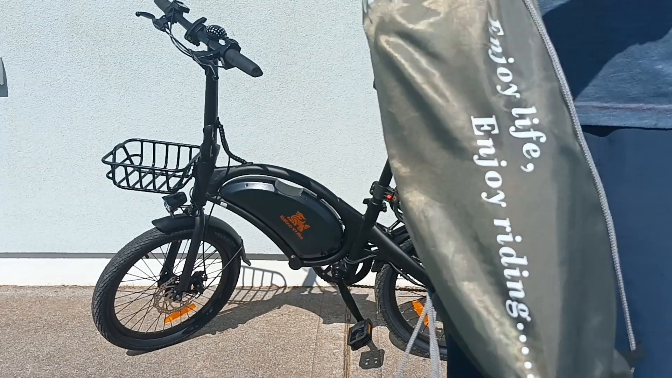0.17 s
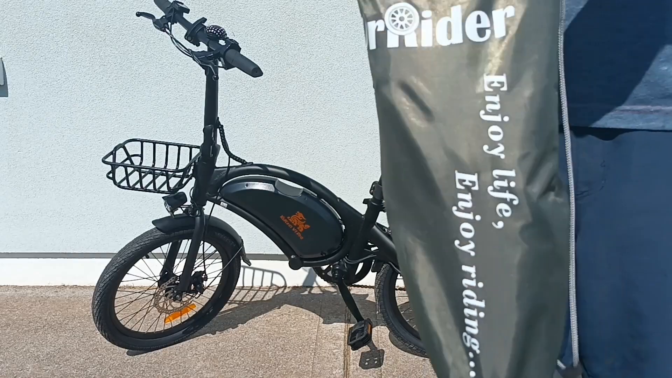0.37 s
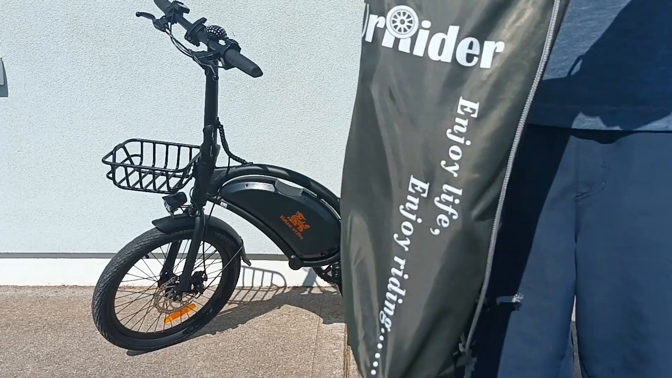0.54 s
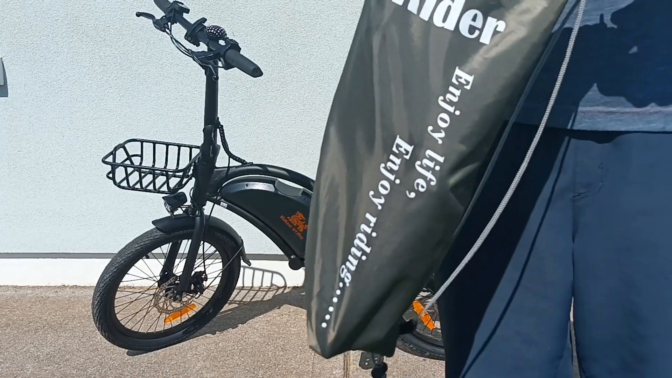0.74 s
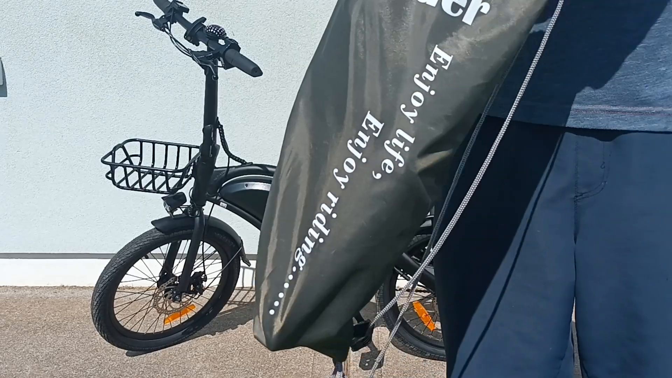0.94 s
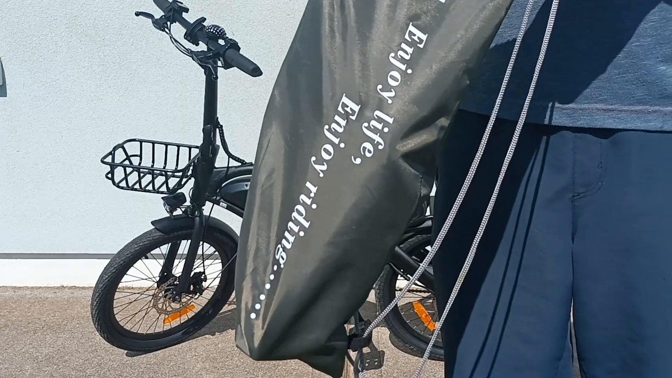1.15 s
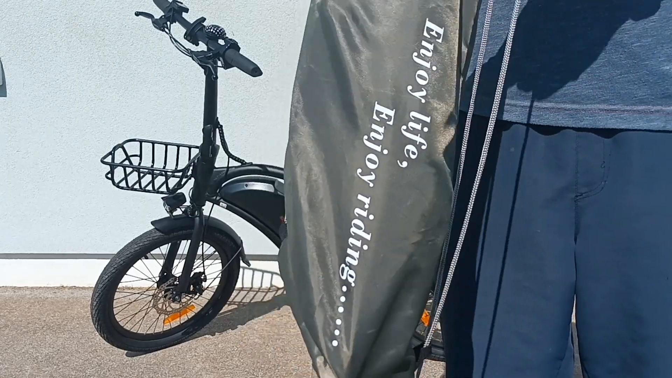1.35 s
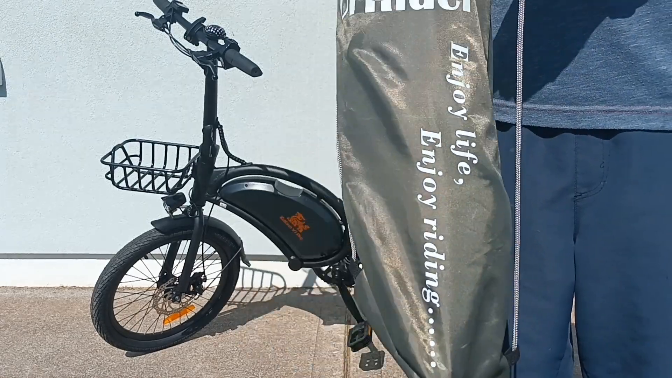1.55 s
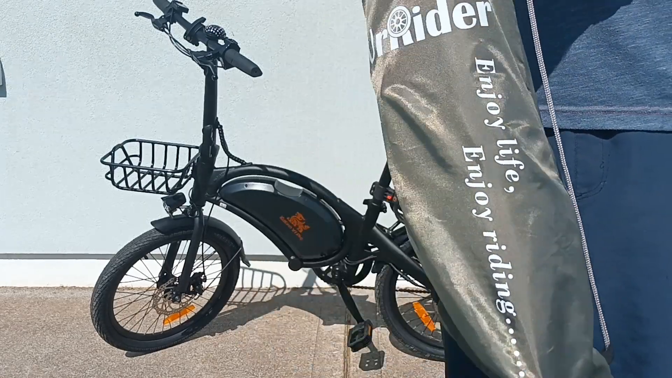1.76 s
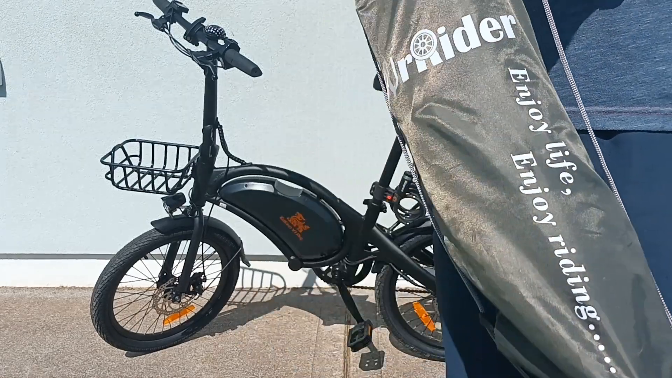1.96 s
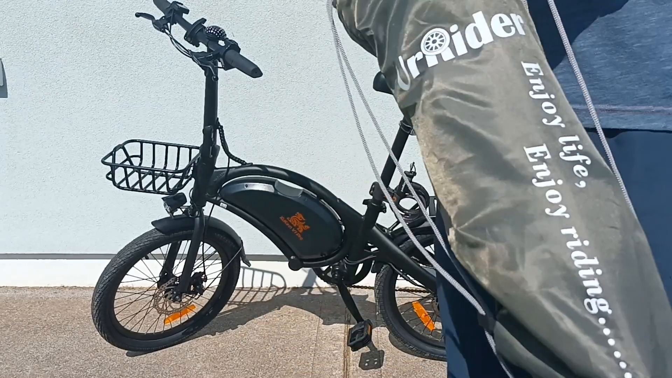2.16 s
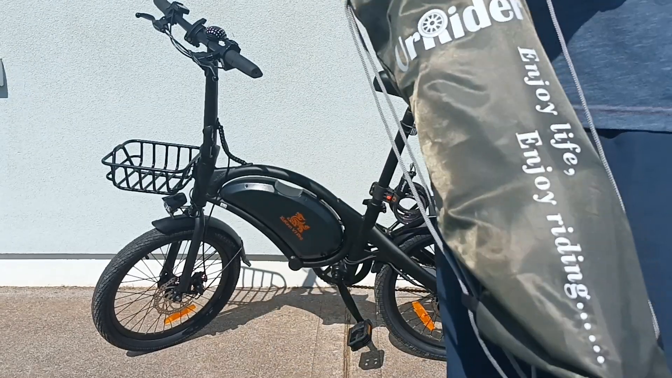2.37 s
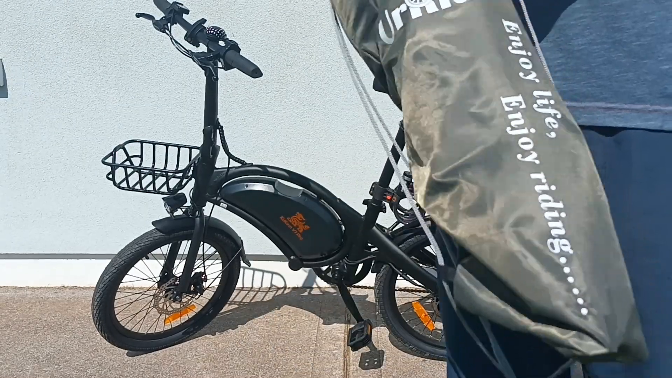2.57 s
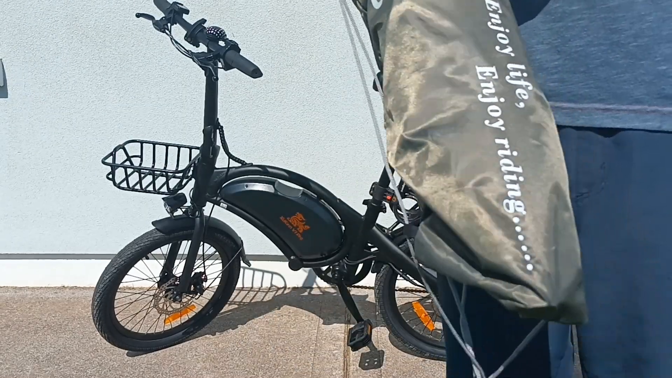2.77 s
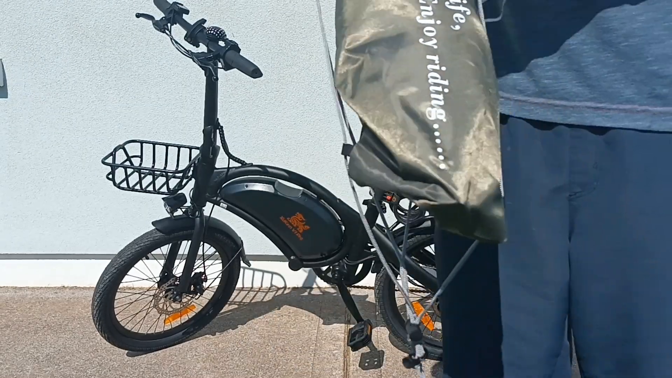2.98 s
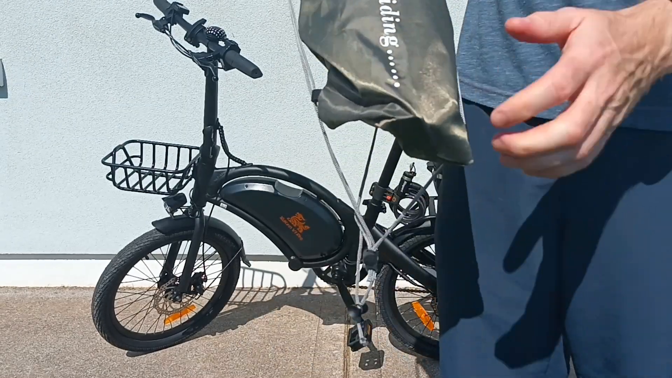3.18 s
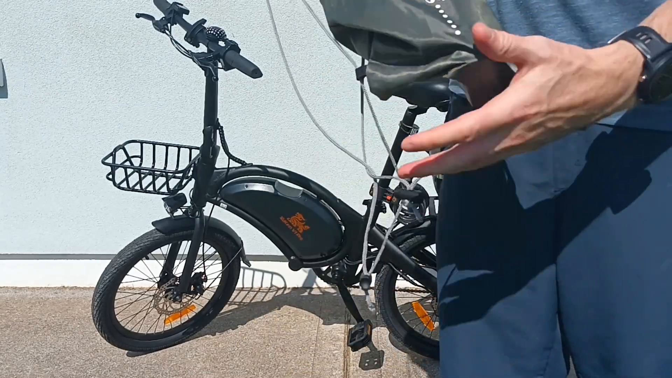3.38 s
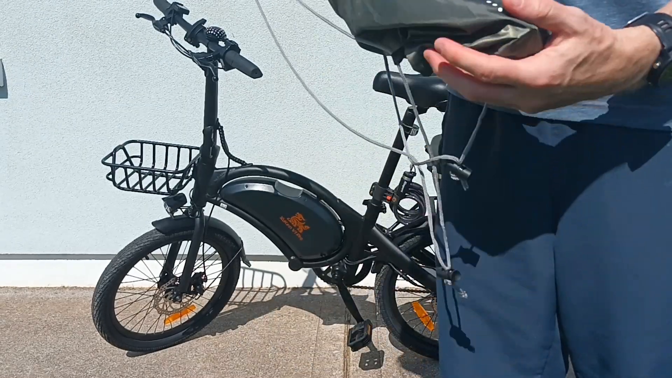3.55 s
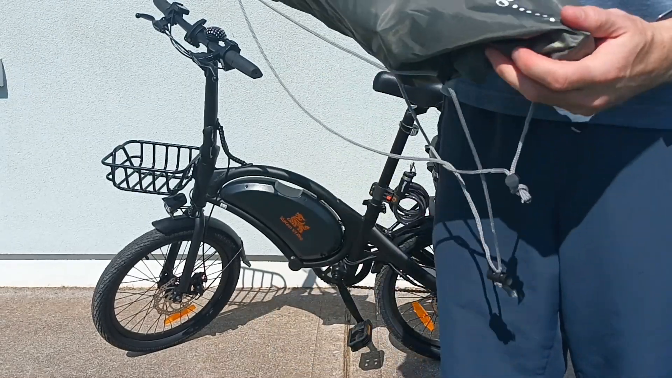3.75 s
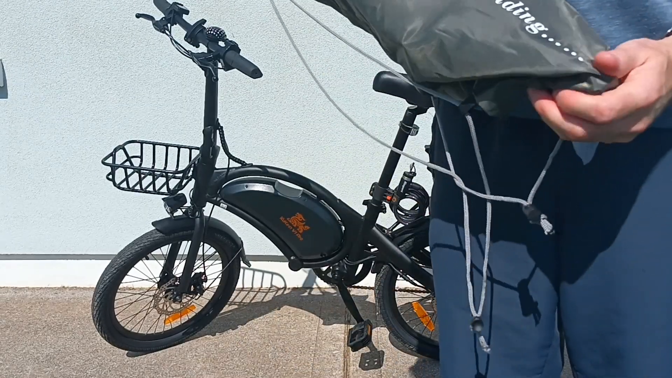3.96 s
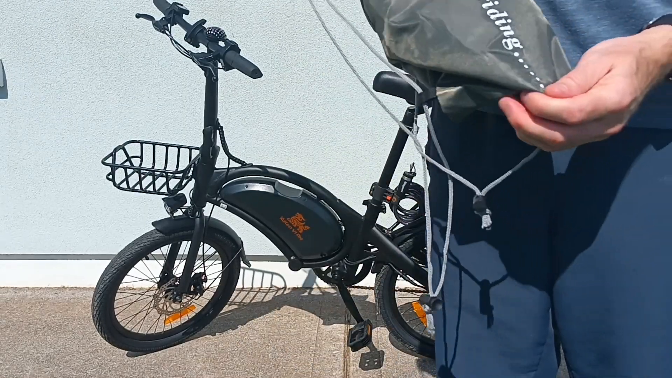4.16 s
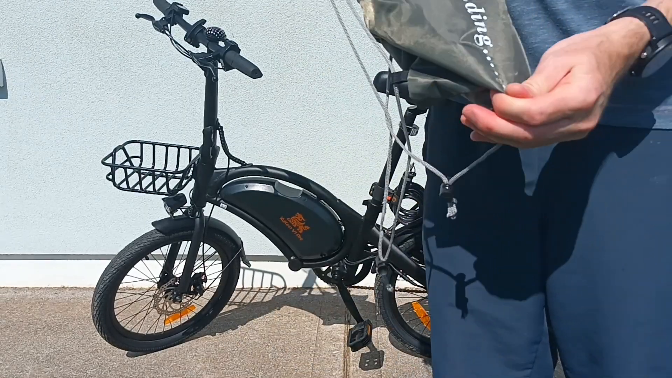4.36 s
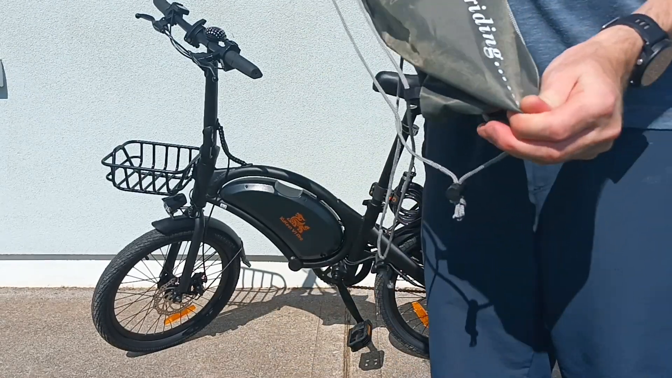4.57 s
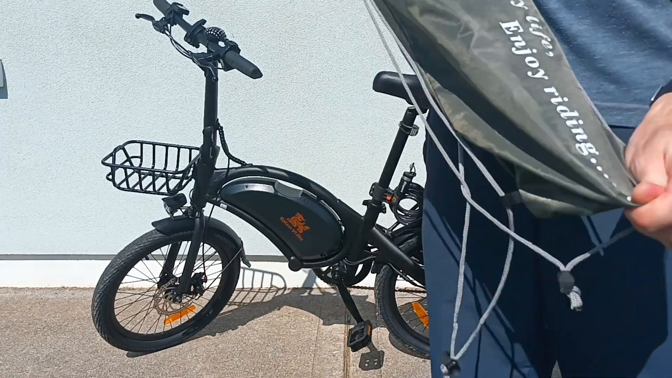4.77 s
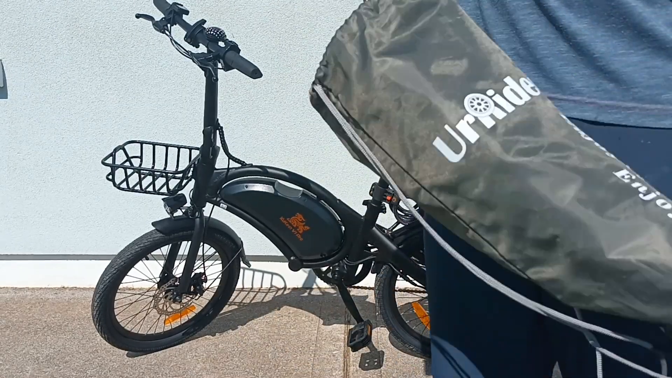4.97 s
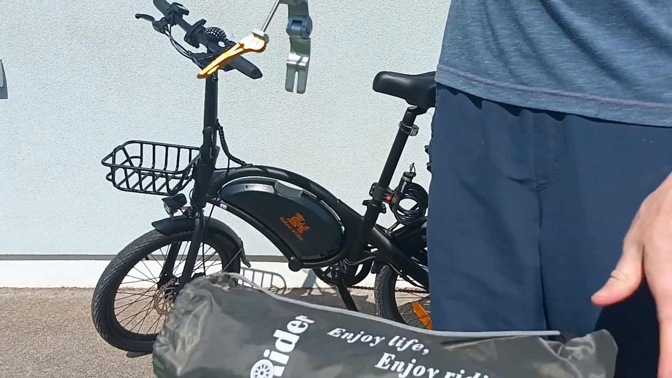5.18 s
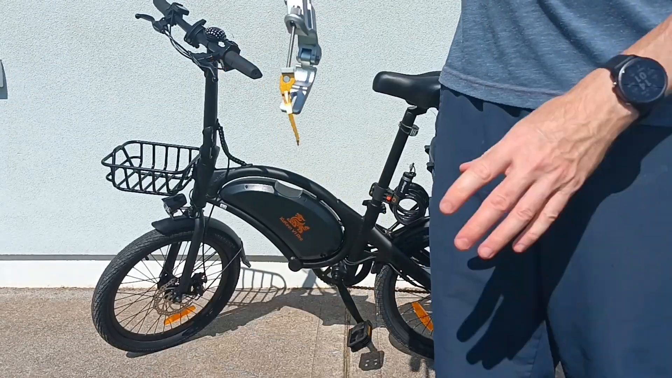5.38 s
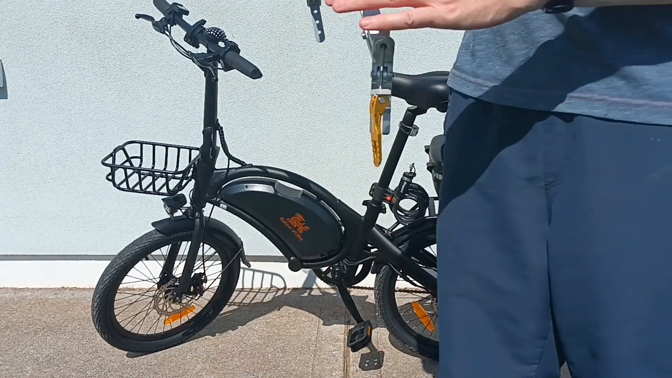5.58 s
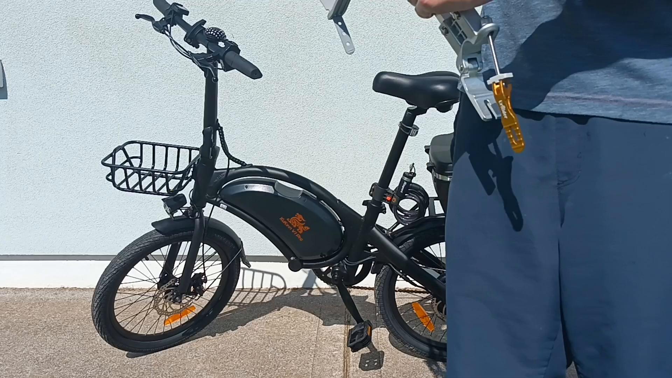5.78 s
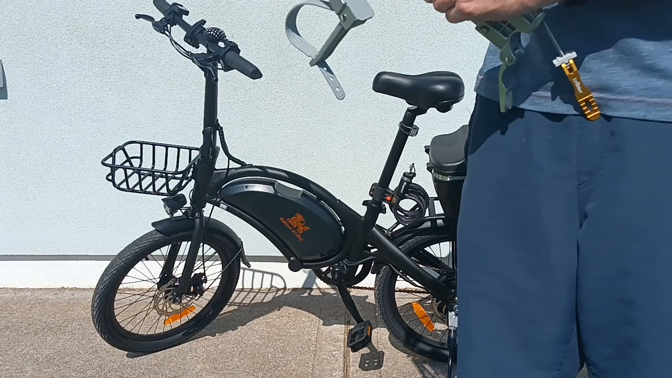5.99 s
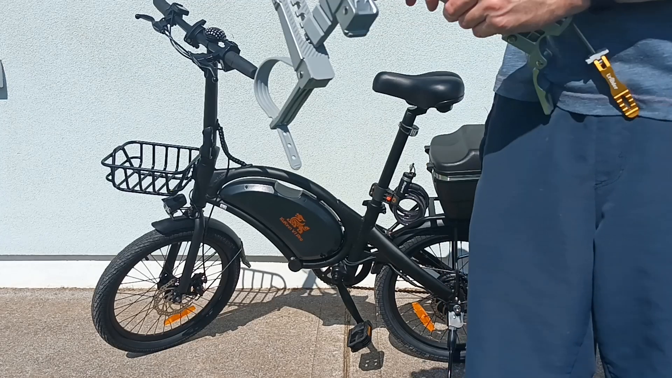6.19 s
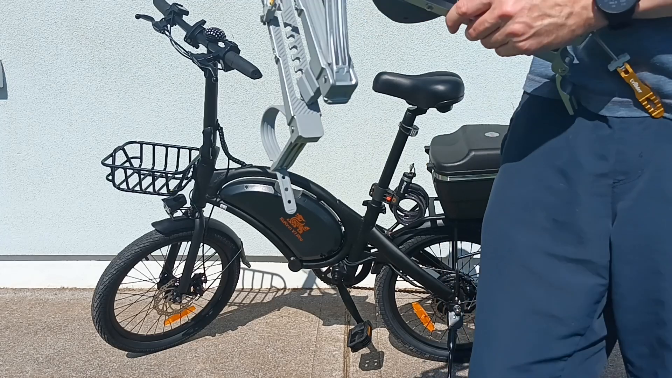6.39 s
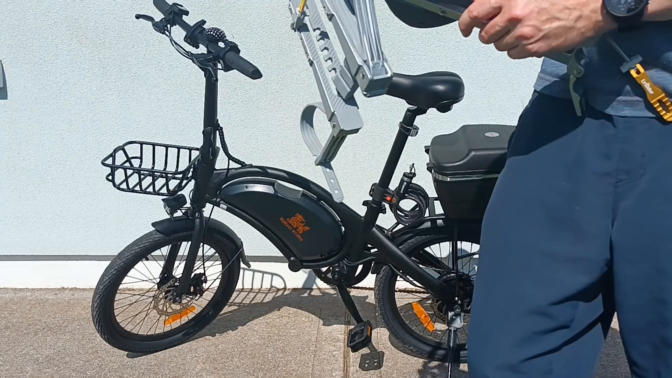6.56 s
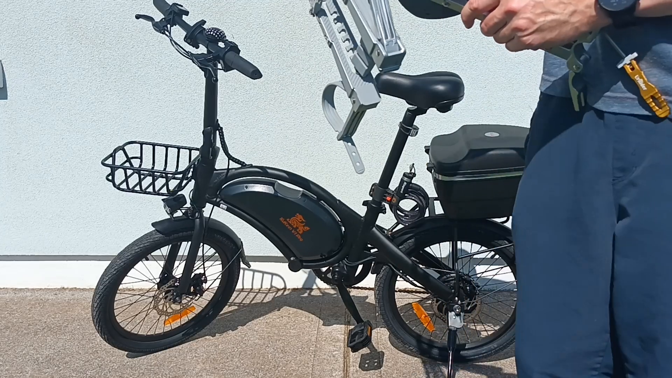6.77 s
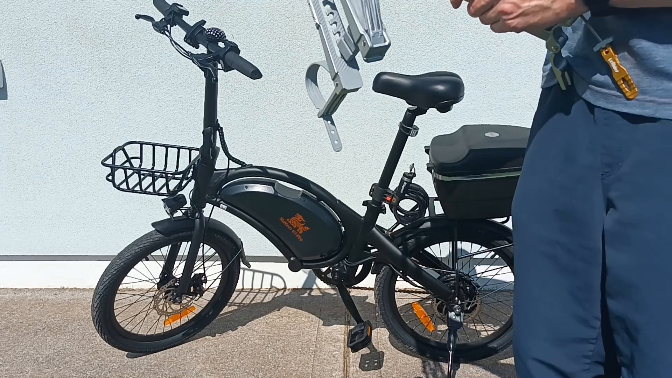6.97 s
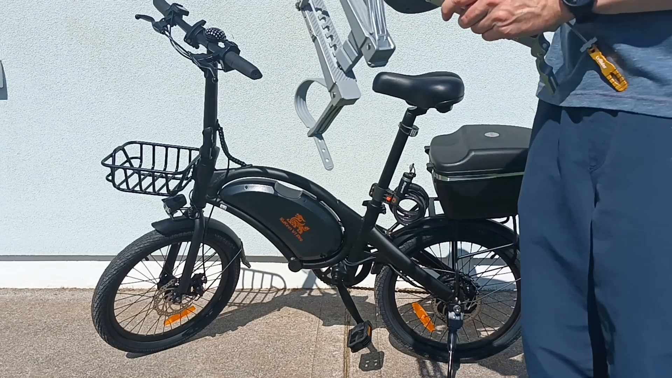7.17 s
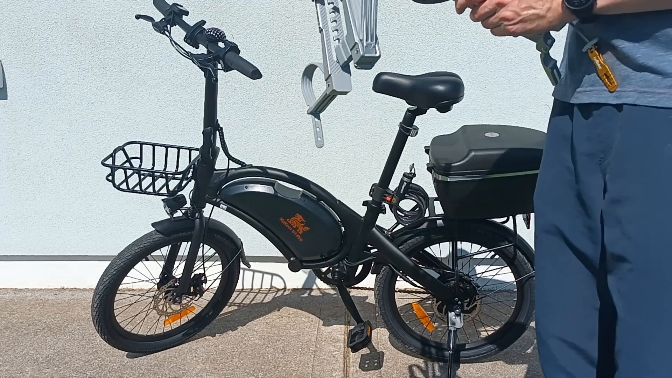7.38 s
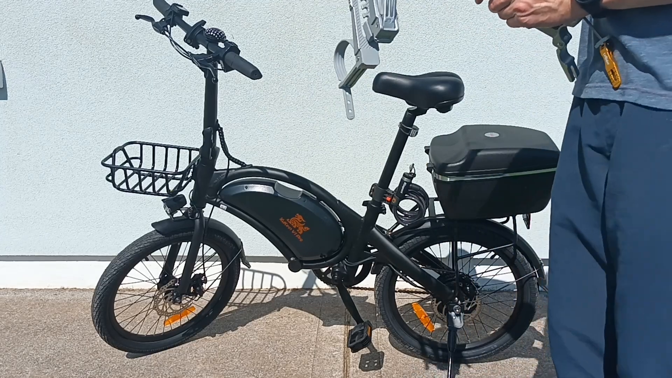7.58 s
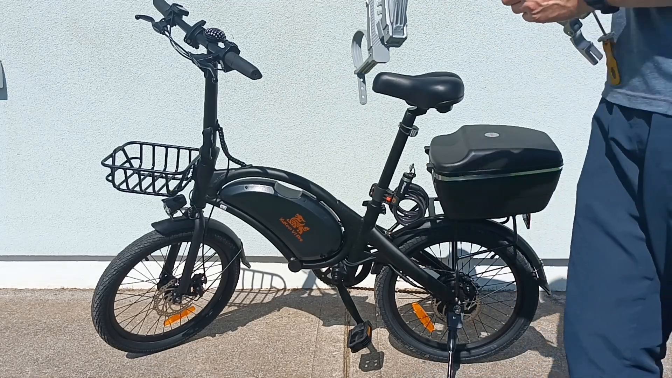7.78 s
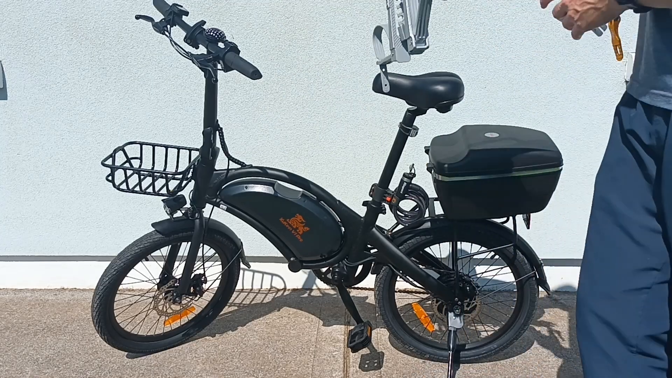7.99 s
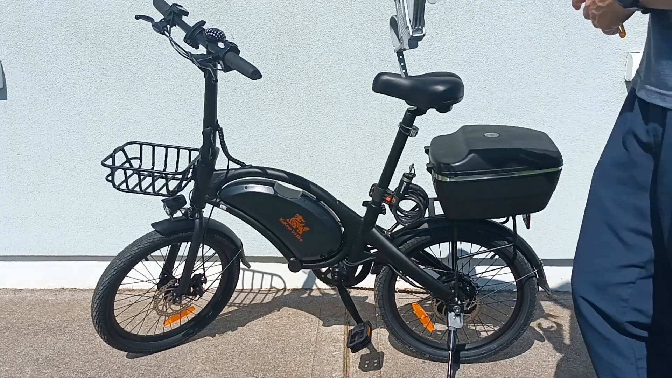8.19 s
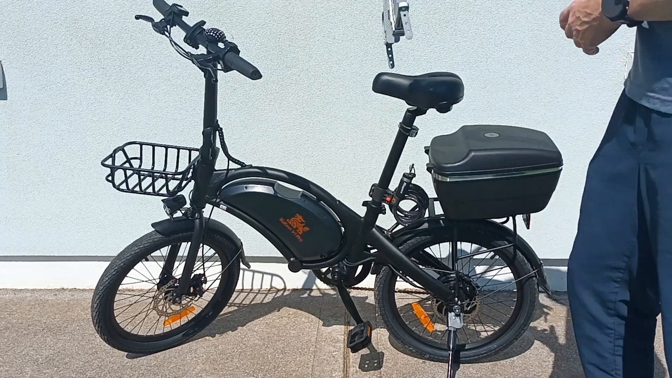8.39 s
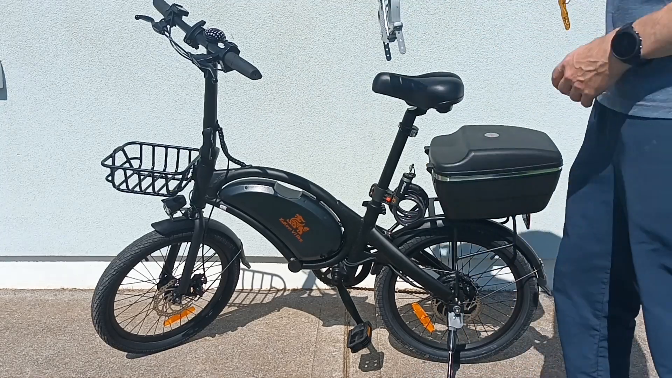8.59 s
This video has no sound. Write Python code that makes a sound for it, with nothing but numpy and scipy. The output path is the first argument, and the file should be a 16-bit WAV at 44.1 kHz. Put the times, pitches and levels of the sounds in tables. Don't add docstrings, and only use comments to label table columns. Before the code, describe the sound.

An outdoor stereo scene by a wall, with a faint, smooth hum of far traffic throughout. From 0 to 0.5 s a nylon bag hisses under rubbing hands, with a hard snap near 0.17 s and a wind thump. Light rustling and thin distant bird whistles follow until about 1.6 s, when stronger strokes and snaps resume until 2.7 s. After a lull, crinkling returns at 3.2 s and builds to the loudest rub and crack at 4.3-4.7 s as the bag is pulled off. Bare metal clinks at 4.8-5.2 s, brightest near 4.9; the bag slaps hollowly on paving at 5.3 s. Small metallic clicks and rings continue to 6.3 s. Then it is quiet, with soft handling rubs near 7.1-7.6 s. Bird whistles return from 6.6 s, livelier and echoing after 7.8 s. A sharp metallic knock at 8.2 s meets gusty low thumps until the end at about 8.6 s.

```python
import sys
import numpy as np
from scipy import signal
from scipy.fft import rfft, irfft, next_fast_len
from scipy.io import wavfile
from scipy.ndimage import map_coordinates

SR = 44100
rng = np.random.default_rng(int(sys.argv[2]) if len(sys.argv) > 2 else 0)


def pcm_store(signal):
    levels = np.round(np.clip(np.atleast_2d(signal), -1, 1) * 32767)
    wavfile.write(sys.argv[1], SR, levels.astype(np.int16).T)


def volts_from_db(level):
    exponent = np.asarray(level, float) / 20
    return 10 ** exponent


N = 380979


def unit_rms(x):
    return x / np.sqrt(np.mean(x ** 2) + 1e-20)


def seconds(length_s):
    return np.arange(round(length_s * SR)) / SR


def add_at(out, start_s, sound):
    start = round(start_s * SR)
    out[..., start:start + sound.shape[-1]] += sound


def in_time(rows):
    time_s, *columns = np.transpose(rows)
    return [np.interp(np.arange(N) / SR, time_s, column) for column in columns]


def at_hz(points, hz):
    point_hz, value = np.transpose(points)
    return np.interp(np.log(hz), np.log(point_hz), value)


def coloured(x, points):
    size = next_fast_len(N)
    hz = np.fft.rfftfreq(size, 1 / SR) + 1
    return irfft(rfft(x, size) * volts_from_db(at_hz(points, hz)), size)[..., :N]


def drift(rate_hz):
    r = np.exp(-40 * np.pi * rate_hz / SR)
    slow = signal.lfilter([1], [1, -2 * r, r * r], rng.standard_normal(N // 20 + 2002))[2000:]
    return np.interp(np.arange(N) / 20, np.arange(len(slow)), unit_rms(slow))


def band(x, low_hz, high_hz):
    return signal.sosfilt(signal.butter(2, [low_hz, high_hz], "band", fs=SR, output="sos"), x)


def ringing(modes, t):
    hz, level_db, t60_s = np.transpose(modes)[:, :, None]
    return volts_from_db(level_db - 60 * t / t60_s) * np.sin(2 * np.pi * hz * t)


# pitch_hz, likeness (0 to 1)
LIKENESS = [(60, 1), (300, 0.94), (1000, 0.85), (2500, 0.65), (5000, 0.55), (10000, 0.4)]


def pair(mid, side, hz):
    alike = np.clip(at_hz(LIKENESS, hz), 0, 1)
    opposite = side * np.array([[1], [-1]])
    return (np.sqrt(1 + alike) * mid + np.sqrt(1 - alike) * opposite) / np.sqrt(2)


# pitch_hz, level_db (per Hz)
HUM = [(30, -88), (120, -89), (300, -92), (600, -99), (1000, -100), (1600, -103), (2500, -105.5),
       (6000, -107), (8000, -109.5), (9600, -107.5), (11500, -114), (13000, -118), (16000, -116)]


def hum():
    mid, side = coloured(rng.standard_normal((2, N)), HUM) * np.sqrt(SR / 2)
    treble = side - signal.lfilter(*signal.butter(1, 900, fs=SR), side)
    apart = 1.16 * side + 0.039 * treble
    return np.array([mid + apart, mid - apart]) * 0.61


# start_s, hold_s, hiss_db, slackness_db
BAG = [(0, 0.19, -47, -7), (0.085, 0.1, -40.5, -5), (0.214, 0.1, -52, 0), (0.32, 0.065, -50, 1),
       (0.449, 0.034, -53, 5), (0.535, 0.18, -62.5, 4.5), (0.822, 0.042, -56.5, -4.5),
       (0.906, 0.14, -50, -11.5), (1.415, 0.025, -52.5, -1), (1.5, 0.07, -75.5, 5),
       (1.647, 0.028, -37, -16), (1.696, 0.16, -41.5, -14.5), (1.823, 0.17, -45, -7.5),
       (2.037, 0.087, -43.5, -6), (2.199, 0.15, -49.5, -1.5), (2.408, 0.014, -48, -2),
       (2.44, 0.032, -46.5, -5), (2.543, 0.11, -68.5, 6), (2.7, 0.013, -45, -14), (3.229, 0.0086, -50, -18),
       (3.305, 0.18, -51, -7.5), (3.426, 0.42, -56.5, -4), (3.861, 0.0063, -41.5, -8.5),
       (3.954, 0.096, -63, 2.5), (4.072, 0.18, -52.5, 4), (4.297, 0.074, -44, -2), (4.358, 0.14, -39.5, -3),
       (4.428, 0.16, -36, -3), (4.499, 0.032, -30.5, -9.5), (4.597, 0.058, -32.5, -11),
       (4.676, 0.045, -34, -15), (4.803, 0.13, -56, 2), (4.95, 0.085, -66, 3), (5.312, 0.038, -43, -9)]
# start_s, hold_s, hiss_db, slackness_db
HANDS = [(5.37, .06, -67, 5), (5.164, .012, -71, -2), (5.679, 0.015, -59, -4.5), (5.758, .012, -59.5, -2),
         (5.823, 0.1, -65, 6.5), (6.119, 0.0044, -77, 2), (6.293, .012, -61.5, 3), (7.13, 0.09, -54, -6.5),
         (7.267, 0.07, -61, -5), (7.35, .07, -56, -9), (7.6, 0.38, -67, -0.5), (8.237, 0.004, -52.5, -2),
         (8.284, 0.41, -65, -3.5)]


def strokes():
    attack_db_per_s, release_db_per_s = 485, 323
    rest_db, rest_slack_db = -79.5, 7.5
    t = np.arange(0, N + 64, 64) / SR
    start_s, hold_s, hiss_db, slack_db = np.transpose(BAG + HANDS)[:, :, None]
    before_s = np.maximum(start_s - t, 0)
    after_s = np.maximum(t - start_s - hold_s, 0)
    away_db = attack_db_per_s * before_s + release_db_per_s * after_s
    power, rest = volts_from_db(hiss_db - away_db) ** 2, volts_from_db(rest_db) ** 2
    total = power.sum(axis=0) + rest
    slack = ((power * slack_db).sum(axis=0) + rest * rest_slack_db) / total
    return in_time(np.transpose([t, 10 * np.log10(total), slack]))


# pitch_hz, level_db (per Hz)
CLOTH = [(200, -7), (380, 0), (600, -7), (800, -4), (1100, 0), (1600, -6), (2500, -5), (4000, -5),
         (6000, -6), (8000, -7), (10200, -6), (11400, -13), (13000, -19), (16000, -21)]


def cloth():
    creases_per_s, spread_db, crease_share = 900, 4.0, 0.1
    patchy_db, wander_samples = 2.6, 3.5
    hiss_db, slack_db = strokes()

    born = rng.random(N) < creases_per_s * volts_from_db(3.5 * drift(25)) / SR
    creases = unit_rms(born * volts_from_db(spread_db * np.minimum(rng.exponential(1, N), 4)))
    grain = 1 + crease_share * signal.lfilter([1], [1, -.93], creases)
    white = unit_rms(rng.standard_normal((2, 2, N)) * grain * volts_from_db(1.6 * drift(45)))

    panels_db, folds_db, weave_db = slack_db + 9.0, slack_db + 6.5, 0.8 * slack_db + 3.0
    parts_db = np.array([panels_db, folds_db, weave_db, np.zeros(N)])
    part_hz = [400, 1000, 2500, 8000]
    out = 0
    edges = np.geomspace(180, 17000, 21)
    for k, (low, high) in enumerate(zip(edges, edges[1:])):
        hz = np.sqrt(low * high)
        shares = [np.interp(np.log(hz), np.log(part_hz), row) for row in np.eye(4)]
        patches = patchy_db * (drift(7.5) + 0.57 * drift(24.3))
        gain = volts_from_db(hiss_db + shares @ parts_db + patches)
        out = out + gain * pair(*band(white[k % 2], low, high), hz)
    out[0] = map_coordinates(out[0], [np.arange(N) + wander_samples * drift(1.4)], order=3)
    return volts_from_db(6) * coloured(out, CLOTH)


# time_s, left_db, right_db
WIND = [(0, -61, -80), (.055, -32, -66), (.185, -44.5, -59), (1.1, -70, -69.5), (1.312, -55.5, -63),
        (2.1, -65, -62), (2.774, -43.5, -66), (2.963, -58.5, -69), (3.2, -45, -71), (3.55, -50.5, -68),
        (3.906, -59, -78), (4.53, -50.5, -52), (4.764, -62, -66), (5.4, -70, -69.5), (6.05, -68.5, -74),
        (7.483, -60, -67.5), (8.251, -41, -37.5), (8.635, -42.5, -47)]
# time_s, level_db, width_ms, port (0 left, 1 right)
THUMPS = [(0.076, -24.5, 3.5, 0), (2.691, -31, 2.3, 0), (2.772, -22.5, 3.4, 0), (3.457, -28.5, 2.7, 0),
          (3.569, -33, 4.5, 0), (4.541, -30, 1.2, 1), (4.542, -30, 1.2, 0), (4.6, -36, 1.5, 1),
          (2.47, -42, 1.0, 1), (2.489, -42, 1.0, 1), (8.287, -25, 2.5, 1), (8.493, -26, 3.5, 1),
          (8.252, -28, 4.0, 1), (7.73, -30.5, 3.7, 0), (8.009, -25.5, 1.95, 1), (8.236, -21.5, 1.6, 1),
          (8.331, -17, 1.9, 1), (8.36, -21, 2.06, 1)]


def wind():
    lumps_db = 3.8
    out = np.zeros((2, N))
    for port, level_db in enumerate(in_time(WIND)):
        white = rng.standard_normal(N)
        rumble = unit_rms(band(white, 26, 80)) + 0.02 * unit_rms(band(white, 80, 130))
        out[port] = volts_from_db(level_db + 2.5 + lumps_db * drift(13.2)) * rumble
    half = 600
    for time_s, level_db, width_ms, port in THUMPS:
        u = np.arange(-half, half) / SR / (width_ms / 1000)
        push = (1 - 0.68 * u ** 2) * np.exp(-u ** 2 / 2)
        middle = round(time_s * SR)
        out[round(port), middle - half:middle + half] += volts_from_db(level_db) * push
    return out


# start_s, pitch_hz, peak_db, t60_s
TICKS = [(.1635, 10100, -15, 0.012), (.171, 1140, -18, 0.02), (.106, 1080, -34, .03),
         (.324, 940, -33.5, 0.038), (.361, 870, -37, .04), (.445, 1090, -42, .03), (2.5665, 800, -34, .04),
         (1.65, 950, -35, .06), (2.566, 350, -40, 0.046), (3.483, 1000, -39, .03), (4.011, 2450, -46, .02),
         (4.053, 1150, -43, .03), (4.098, 940, -33.5, 0.043), (4.435, 11900, -36, .03),
         (4.452, 400, -27, 0.06), (4.8172, 1690, -37, .015), (4.8366, 9400, -37, .03),
         (4.838, 7300, -39, .03), (4.846, 1200, -49, 0.018), (4.8635, 1100, -38, 0.049),
         (4.895, 2940, -27, .04), (5.0, 1000, -47, 0.024), (5.112, 4150, -54, .02),
         (5.1325, 3900, -44.5, 0.032), (5.4927, 9700, -55, .03), (5.3543, 1650, -25, .007),
         (5.39, 1600, -48, .08), (5.5142, 8400, -51, .03), (5.5546, 3000, -55, .02),
         (5.6155, 2150, -45.5, 0.069), (5.6469, 4290, -44, 0.028), (5.660, 8500, -50, .03),
         (5.698, 6100, -48, .04), (5.70, 2200, -47, .03), (5.7402, 2000, -46, .04),
         (5.7536, 9900, -36.5, 0.045), (5.763, 2300, -47, .04), (5.805, 3870, -44, .04),
         (5.862, 4000, -54, .02), (5.871, 4300, -46, .02), (5.892, 4200, -51, .02),
         (5.9033, 4540, -34.5, 0.027), (5.909, 1900, -44, .04), (5.922, 1500, -45, .03),
         (6.1223, 9590, -42, 0.028), (6.1971, 3830, -50, .03), (8.238, 5300, -36, .04),
         (8.238, 4400, -35, .05), (8.226, 2800, -36, .07)]


def ticks():
    t, out = seconds(.08), np.zeros((2, N + SR))
    reach = 2 ** 0.25
    for start_s, hz, peak_db, t60_s in TICKS:
        dying = rng.standard_normal((2, len(t))) * volts_from_db(-60 * t / t60_s)
        burst = pair(*band(dying, hz / reach, hz * reach), hz)
        add_at(out, start_s, volts_from_db(peak_db - 3.5) * burst / np.abs(burst).max())
    return out[:, :N]


# start_s, length_s, pitch_hz (centre), width_octaves, level_db
SCUFFS = [(0.35, 0.05, 805, 0.69, -47.5), (0.54, 0.036, 700, 1.6, -57), (1.176, 0.09, 640, 2.4, -57),
          (4.95, 0.05, 8400, 0.22, -57.5), (4.884, 0.043, 3700, 2.5, -41.5), (5.29, 0.085, 2600, 1.4, -51),
          (.13, 0.035, 9900, 0.35, -43), (1.07, 0.07, 250, 3.84, -52.5), (.169, 0.012, 330, 1.3, -33),
          (6.287, 0.053, 3170, 0.92, -56.5), (6.496, 0.049, 8900, 4.5, -68),
          (7.72, 0.037, 1700, 3.3, -60.5)]


def scuffs():
    out = np.zeros((2, N))
    for start_s, length_s, hz, octaves, level_db in SCUFFS:
        u = np.linspace(0, 1, round(length_s * SR))
        lumps = volts_from_db(4.6 * np.repeat(rng.standard_normal(60), 132)[:len(u)])
        swell = np.sin(np.pi * u ** 0.41) * lumps * rng.standard_normal((2, len(u)))
        low, high = hz * 2 ** (-octaves / 2), min(hz * 2 ** (octaves / 2), 18000)
        rub = unit_rms(band(band(swell, low, high), low, high))
        add_at(out, start_s, volts_from_db(level_db) * pair(*rub, hz))
    return out


# start_s, peak_db, low_part_db
SNAPS = [(0.1635, -12, -29), (0.1723, -6, -1.5), (0.3004, -34, 12.5), (0.3233, -35, 5), (1.1394, -33, -5),
         (1.633, -24, -9), (1.6554, -22.5, -1), (1.7908, -27, 2.5), (2.3977, -39, 13.5), (2.4145, -23, 1),
         (2.4658, -16, -13), (2.5668, -40.5, 17), (3.2166, -33, -23), (3.3168, -21.5, -10),
         (3.4206, -22.5, 0.5), (3.4794, -34, 9), (3.648, -26.5, -25), (3.963, -28.5, -21),
         (4.0754, -35, 14.5), (4.0961, -22, 5), (4.336, -15.5, -6), (4.4738, -3, -4.5), (4.6244, -8.5, -13),
         (4.6877, -31, -22)]
# start_s, peak_db, low_part_db
KNOCKS = [(4.759, -31, -2), (4.818, -55, 7), (4.8361, -24.5, -14), (4.8957, -6.5, -40), (4.9238, -18, -27),
          (5.1315, -33.5, -3), (5.1694, -33, -25), (5.3145, -32, -20), (5.354, -27, -20), (5.5794, -32, 1),
          (5.6146, -35.5, 1), (5.675, -21, -32), (5.7535, -20, -31), (5.8047, -25.5, -7.5),
          (5.834, -18.5, -7.5), (5.904, -23, -38), (5.9205, -33, -4), (6.122, -38, -27), (6.3011, -34, -2),
          (8.129, -26, -13), (8.2351, -10, -30)]
# pitch_hz, level_db, t60_s
FRAME = [(1570, -8, 0.15), (1870, 4.5, 0.045), (2224, -9, 0.091), (2600, 3, 0.051), (2920, -3.5, 0.08),
         (3600, -12, 0.05), (4190, -2, 0.067), (4900, 1, 0.072), (6070, -19, 0.075), (7270, -40, 0.02),
         (8170, 6, 0.029), (10100, -5, 0.04), (11750, -52.5, 0.24), (12800, -57, 0.042)]


def snaps():
    frame_free_s = 4.74
    t, out = seconds(.12), np.zeros((2, N + SR))
    modes = ringing(FRAME, t)
    crack = np.exp(-t / .0006) + .55 * volts_from_db(-60 * t / .035)
    thud = volts_from_db(-60 * t / 0.048)
    for start_s, peak_db, low_db in SNAPS + KNOCKS:
        noise = rng.standard_normal((2, len(t)))
        high = pair(*band(noise * crack, 2300, 10800), 3000)
        low = pair(*band(band(noise * thud, 295, 1700), 295, 1700), 620)
        metal = 0
        if start_s > frame_free_s:
            metal = volts_from_db(-18 + 5 * rng.standard_normal(len(FRAME))) @ modes
        add_at(out, start_s, volts_from_db(peak_db - 20.0) * (high + metal + volts_from_db(low_db + 13.0) * low))
    return out[:, :N]


# start_s, length_s, first_pitch_hz, level_db
RISES = [(0.635, 0.027, 3950, -56), (.72, 0.075, 2860, -57.5), (1.487, 0.019, 5700, -58),
         (6.64, 0.02, 5570, -66), (6.792, 0.02, 6100, -58), (7.854, 0.015, 3550, -54),
         (7.896, 0.016, 4690, -43), (8.029, 0.023, 3210, -48), (8.063, 0.016, 4880, -44.5),
         (8.05, .012, 3970, -49), (8.271, .012, 3950, -47), (1.5, 0.043, 5580, -60),
         (8.206, 0.041, 3125, -42.5), (8.303, .04, 2570, -69), (8.403, 0.016, 3190, -47.5),
         (8.46, .014, 3490, -46.5), (8.535, 0.035, 2850, -55), (7.07, .02, 4900, -63),
         (7.215, .025, 4750, -61)]
# start_s, length_s, pitch_hz, level_db
HOLDS = [(.59, 0.035, 3030, -58), (.775, 0.03, 4510, -50.5), (.76, .03, 4020, -62), (.79, 0.2, 3700, -61),
         (1.09, 0.11, 3620, -63), (.995, 0.03, 3650, -56), (1.04, 0.07, 4050, -61),
         (1.252, 0.035, 6750, -60), (1.358, 0.022, 4200, -57), (1.585, 0.034, 7410, -45),
         (6.827, 0.053, 5930, -51), (6.989, 0.016, 4820, -54), (7.005, .02, 5150, -57),
         (7.56, .05, 4200, -50.5), (7.27, .012, 4450, -56), (7.025, 0.035, 5090, -47),
         (7.15, 0.041, 5050, -50.5), (7.285, 0.026, 5030, -49), (7.32, 0.022, 4620, -44),
         (7.64, 0.15, 4120, -66), (7.865, 0.033, 4040, -49.5), (7.873, 0.014, 4360, -48),
         (8.035, 0.025, 3530, -47), (8.053, 0.015, 4650, -40), (8.079, 0.0089, 4630, -48),
         (8.268, 0.04, 4190, -46.5), (8.415, 0.03, 3480, -37), (8.465, 0.024, 3750, -44),
         (8.5, .09, 3700, -53), (8.3, .06, 4250, -53), (7.905, .03, 5050, -50), (7.449, .022, 4000, -46.5),
         (7.922, .022, 4550, -38), (7.955, .04, 4520, -50), (7.67, .07, 3480, -62), (7.715, .04, 3800, -60),
         (.955, .06, 3900, -62), (.685, .035, 4280, -55), (8.57, .06, 3600, -54), (7.66, .03, 4200, -57)]
# start_s, length_s, first_pitch_hz, level_db
SAGS = [(.66, 0.066, 4590, -54), (1.245, 0.03, 5780, -61), (1.295, 0.016, 4650, -56),
        (.8, 0.049, 4650, -56.5), (7.335, 0.015, 4700, -48), (1.416, 0.015, 4800, -53),
        (1.42, 0.022, 5920, -58), (1.54, 0.022, 7750, -45), (6.672, 0.047, 6200, -59.5),
        (7.312, 0.01, 4940, -43), (7.413, 0.013, 4900, -43), (7.547, 0.015, 4450, -51),
        (7.17, .016, 4950, -52), (7.33, .02, 4700, -50), (1.2, .035, 3700, -62)]
# start_s, length_s, first_pitch_hz, level_db
DROPS = [(7.18, 0.012, 3900, -63), (7.347, 0.01, 4000, -52), (7.466, 0.011, 4000, -55.5),
         (7.953, 0.015, 3760, -58.5), (8.092, 0.017, 3450, -59), (8.286, 0.02, 3560, -49),
         (8.482, 0.028, 3730, -48)]


def song():
    rise_octaves_per_s = 8.5
    notes = [(start_s, length_s, hz, hz * 2 ** (rise_octaves_per_s * length_s), level_db)
             for start_s, length_s, hz, level_db in RISES]
    for kind, end_ratio in ((HOLDS, 1), (SAGS, .925), (DROPS, .72)):
        notes += [(start_s, length_s, hz, hz * end_ratio, level_db)
                  for start_s, length_s, hz, level_db in kind]
    return notes


def bird():
    echo_db, echo_t60_s, pan_db, warble = -3.0, .42, 4.0, .012
    whistle, wobble = np.zeros(N + SR), 1 + warble * drift(82)
    for start_s, length_s, first_hz, last_hz, level_db in song():
        u, start = np.linspace(0, 1, round(length_s * SR)), round(start_s * SR)
        hz = (first_hz + (last_hz - first_hz) * u) * wobble[start:start + len(u)]
        phase = 2 * np.pi * np.cumsum(hz) / SR
        tone = np.sin(phase) + 0.017 * np.sin(2 * phase)
        add_at(whistle, start_s, volts_from_db(level_db) * np.sin(np.pi * u) ** 0.57 * tone)
    whistle = whistle[:N]

    t = seconds(.7)
    swell = np.minimum(t / .008, 1) ** 2
    echoes = rng.standard_normal((2, len(t))) * volts_from_db(-60 * t / echo_t60_s) * swell
    echoes = volts_from_db(echo_db) * echoes / np.sqrt(np.sum(echoes ** 2, axis=1, keepdims=True))
    scattered = whistle[None] * (.8 + .6 * drift(190))
    direct = .88 * np.array([whistle, np.roll(whistle, 9)])
    heard = direct + signal.fftconvolve(scattered, echoes, axes=1)[:, :N]
    return heard * volts_from_db(np.array([[pan_db], [-pan_db]]) / 2)


# start_s, pitch_hz, level_db, t60_s
RINGS = [(4.953, 4258, -42.5, .19), (5.135, 11830, -66, .2), (3.215, 4450, -55, .2), (5.17, 11830, -54, .2),
         (5.17, 7270, -48, .06), (5.17, 9706, -54, .04), (5.181, 9706, -54, .06), (5.17, 10900, -56, .06),
         (5.18, 7800, -54, .05), (5.555, 6070, -57, .1), (5.676, 10480, -56, .15), (5.68, 6067, -53, .14),
         (5.78, 3585, -50, .1), (5.676, 11800, -57, .15), (5.555, 4000, -60, .06), (6.07, 4100, -66, .3),
         (4.805, 10500, -54, .08), (4.94, 12800, -62, .12), (5.615, 11800, -64, .1),
         (5.834, 11750, -55, .1), (5.903, 12000, -57, .1), (4.96, 1570, -52, .35), (8.16, 7200, -64, .4),
         (8.33, 7000, -62, .4)]
# start_s, level_db
LEVER = [(4.757, -68), (5.617, -70), (5.676, -57), (5.755, -71), (5.805, -70), (5.834, -43), (5.903, -58),
         (8.235, -49)]


def frame():
    lever_hz, lever_t60_s = 9470, 0.42
    t, out = seconds(.5), np.zeros(N + SR)
    clinks = [(start_s, lever_hz, level_db, lever_t60_s) for start_s, level_db in LEVER]
    for start_s, hz, level_db, t60_s in RINGS + clinks:
        tone = np.sin(2 * np.pi * hz * t) + 0.22 * np.sin(2 * np.pi * hz * 1.004 * t)
        add_at(out, start_s, volts_from_db(level_db - 60 * t / t60_s) * tone)
    out = np.array([np.roll(out, 2)[:N], out[:N]])
    return out * volts_from_db(np.array([[-5], [-6]]))


# start_s, peak_db
SLAPS = [(5.2866, -45), (5.2936, -33), (5.3001, -29), (5.306, -32), (5.3145, -22), (5.3235, -31),
         (5.328, -32), (5.333, -30), (5.341, -39), (5.348, -38), (5.3544, -34), (5.362, -50), (5.374, -46)]
# pitch_hz, level_db, t60_s
BODY = [(690, -6, 0.057), (794, -1.5, .045), (940, -3.5, 0.033), (1100, -3.5, 0.039), (1350, -11, .025),
        (1555, 1, 0.051), (1825, 2, 0.037)]


def landing():
    t, out = seconds(.08), np.zeros(N + SR)
    modes = ringing(BODY, t)
    for start_s, peak_db in SLAPS:
        chance = rng.standard_normal(len(BODY))
        add_at(out, start_s, volts_from_db(peak_db - 11.0 + 5.8 * chance) @ modes)
    return band(band(out[:N] + 1e-18, 560, 2150), 560, 2150)


# pitch_hz, level_db (over the right port)
LEFT_PORT = [(200, 3), (1500, 3), (2500, 4.5), (5000, 2.5), (8200, 1.5), (9200, 5), (10300, 11), (11500, 9),
             (13000, 7.5), (15500, 5)]


def scene():
    air = hum() + cloth() + ticks() + scuffs() + snaps() + bird() + frame() + landing()
    air[0] = coloured(air[0], LEFT_PORT)
    return air + wind()


def band_limit(x):
    return signal.sosfilt(signal.butter(12, 16500, fs=SR, output="sos"), x)


def record(dry):
    lag_samples, cutoff_hz = 40, 15950
    late = np.array([np.roll(dry[0], lag_samples), dry[1]])
    steep = signal.ellip(10, .3, 30, cutoff_hz - 150, fs=SR, output="sos")
    mix = signal.sosfilt(steep, late)
    return band_limit(mix)


dry = scene()
out = record(dry)
pcm_store(out)
```